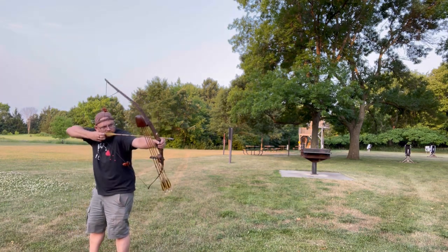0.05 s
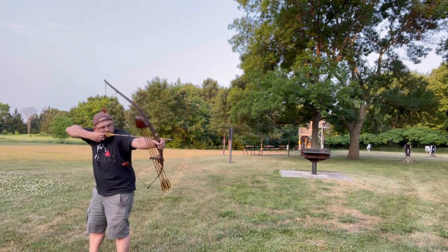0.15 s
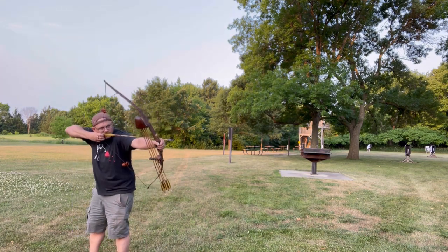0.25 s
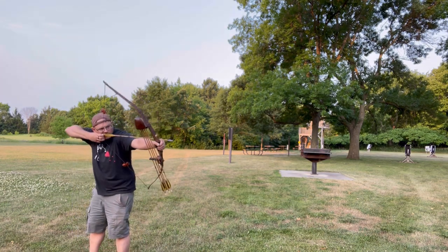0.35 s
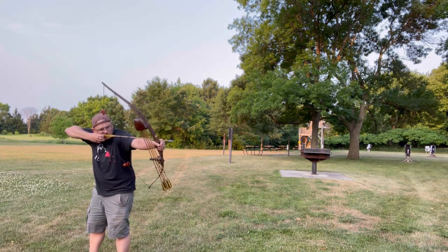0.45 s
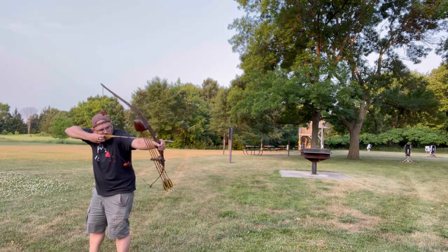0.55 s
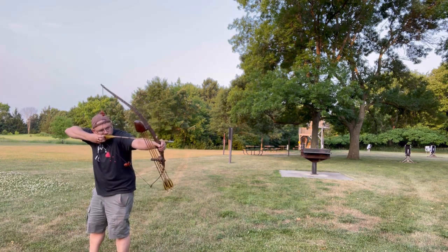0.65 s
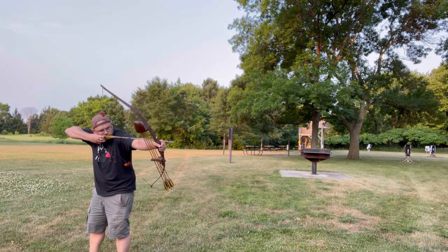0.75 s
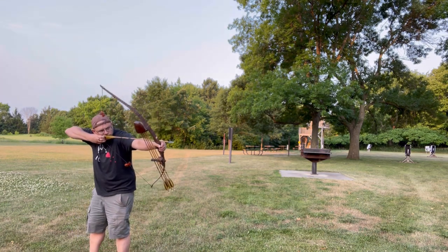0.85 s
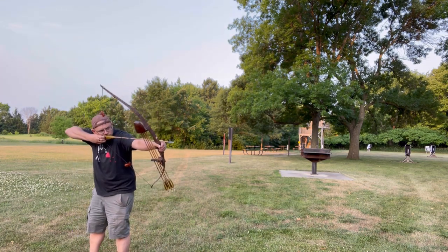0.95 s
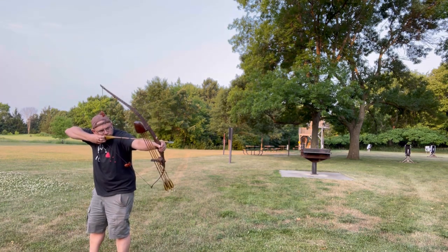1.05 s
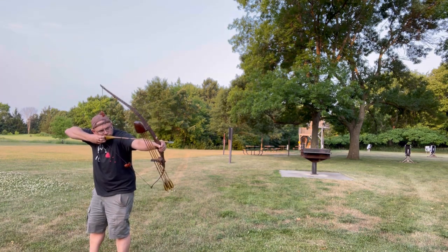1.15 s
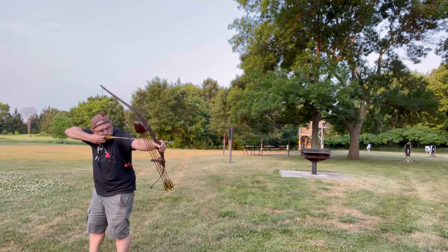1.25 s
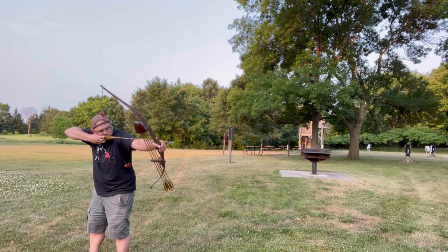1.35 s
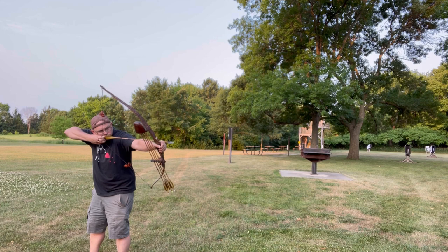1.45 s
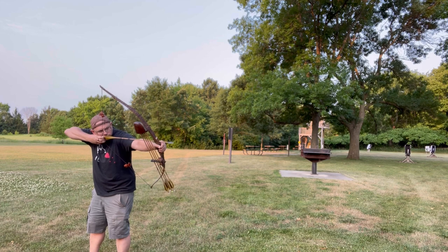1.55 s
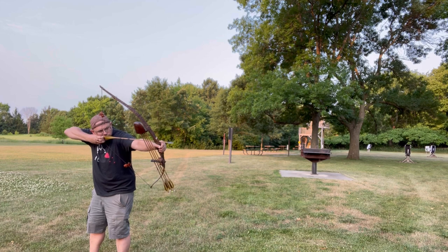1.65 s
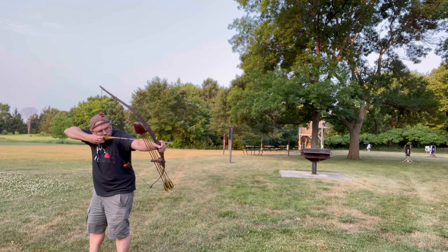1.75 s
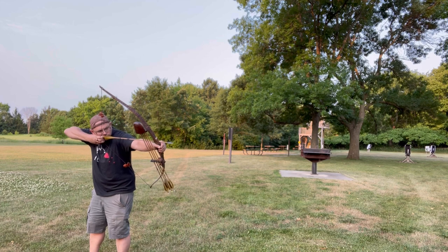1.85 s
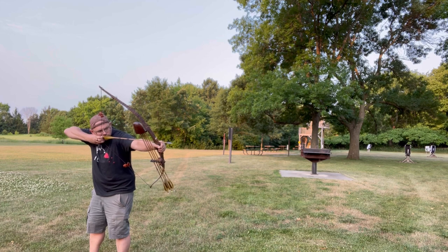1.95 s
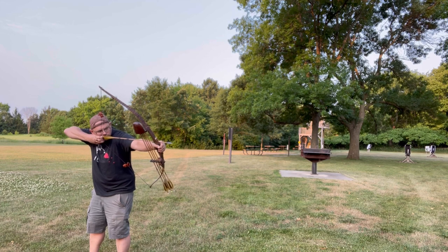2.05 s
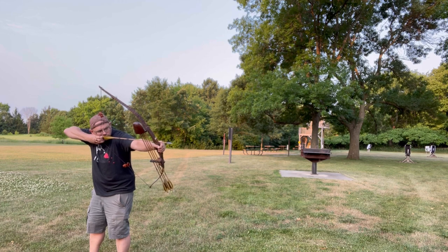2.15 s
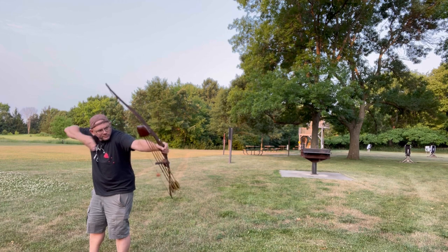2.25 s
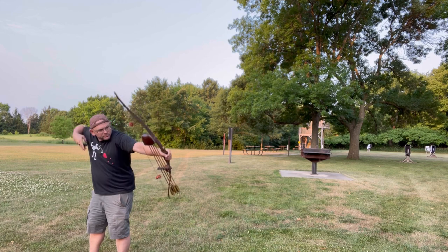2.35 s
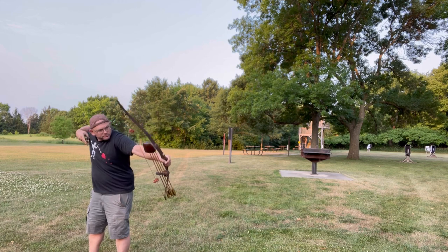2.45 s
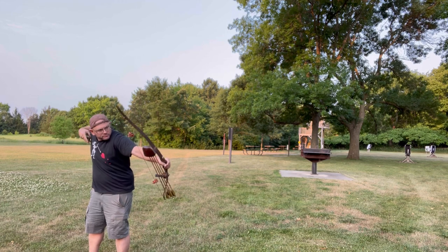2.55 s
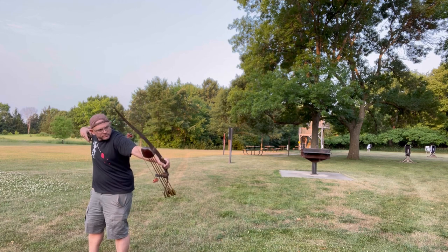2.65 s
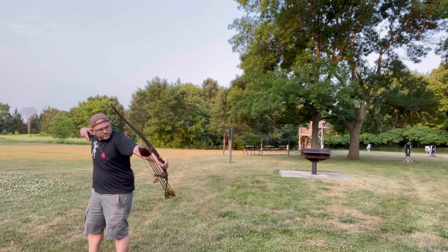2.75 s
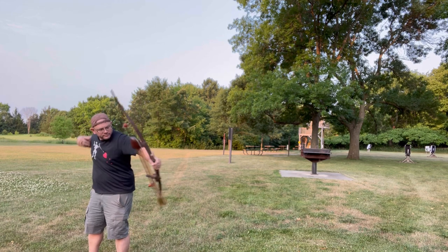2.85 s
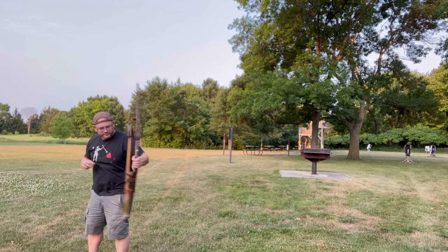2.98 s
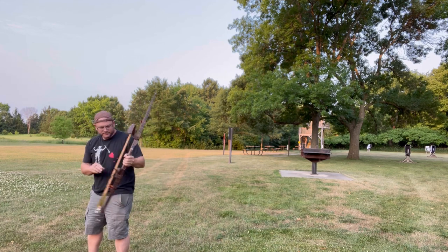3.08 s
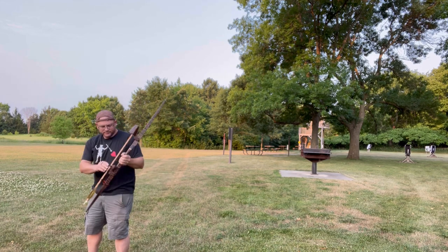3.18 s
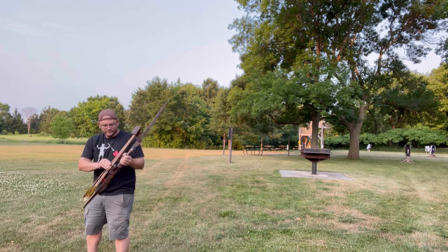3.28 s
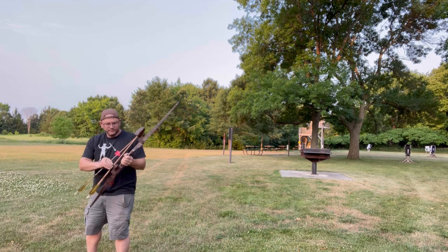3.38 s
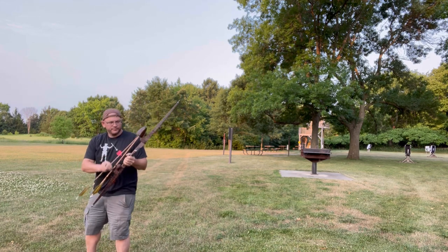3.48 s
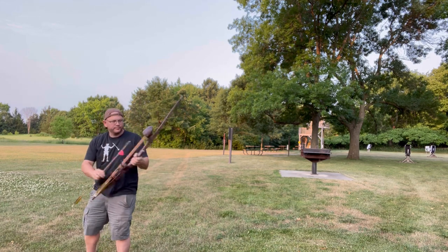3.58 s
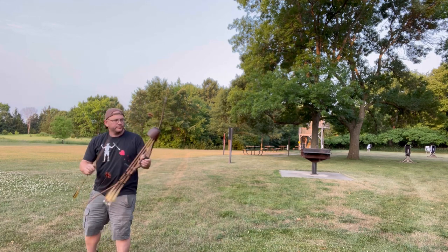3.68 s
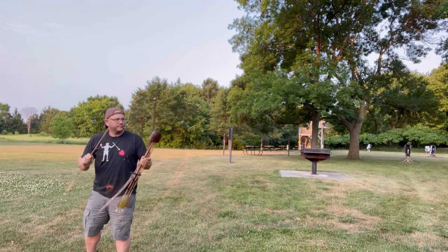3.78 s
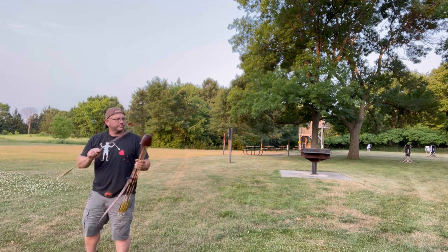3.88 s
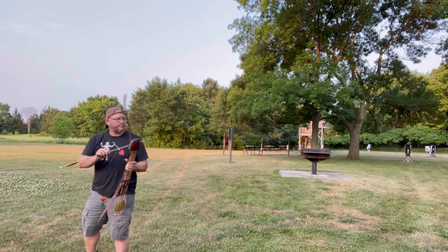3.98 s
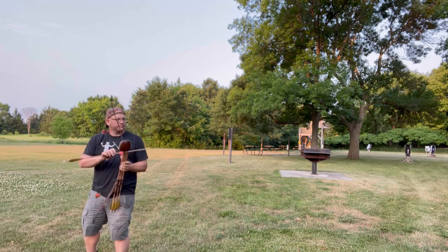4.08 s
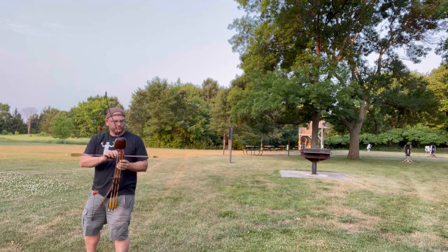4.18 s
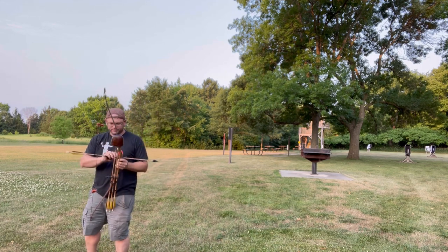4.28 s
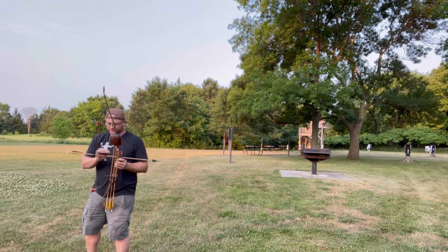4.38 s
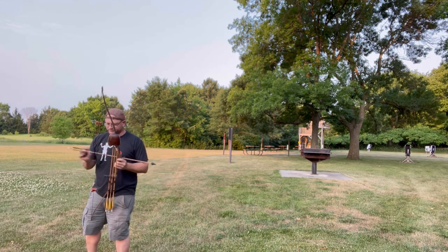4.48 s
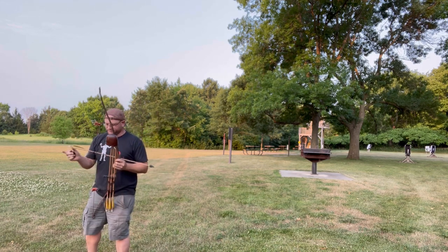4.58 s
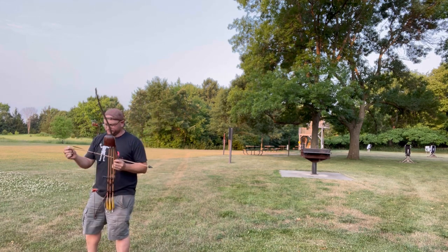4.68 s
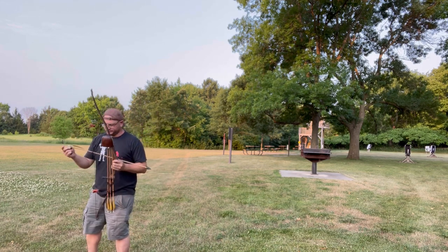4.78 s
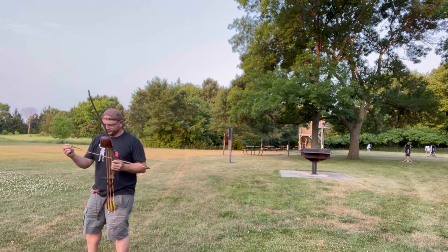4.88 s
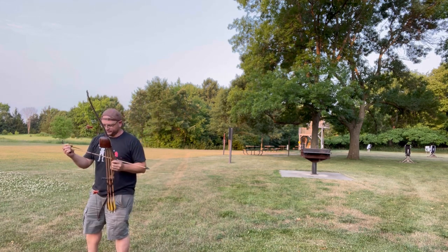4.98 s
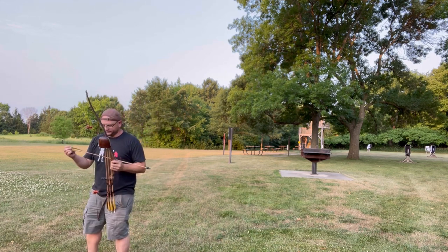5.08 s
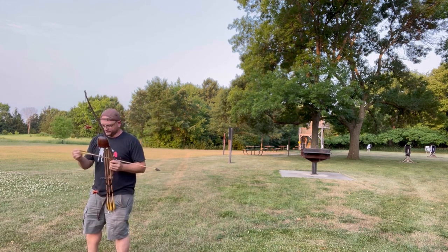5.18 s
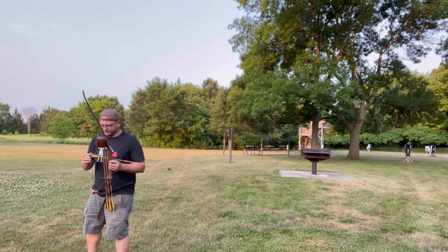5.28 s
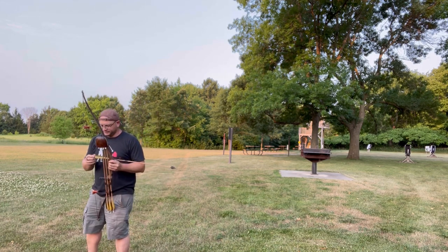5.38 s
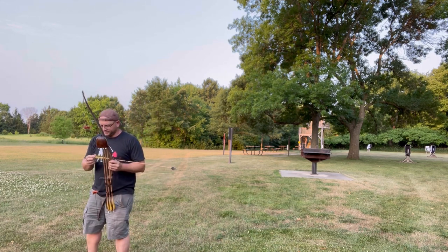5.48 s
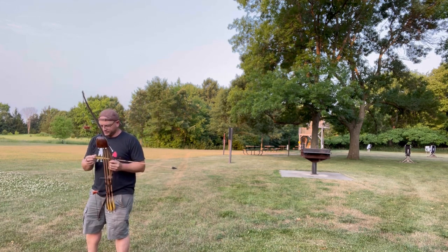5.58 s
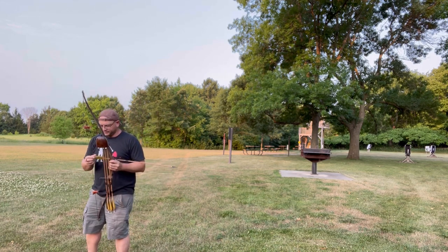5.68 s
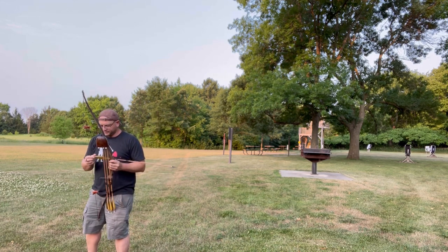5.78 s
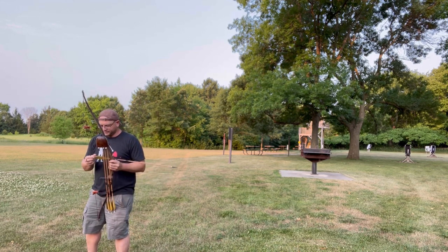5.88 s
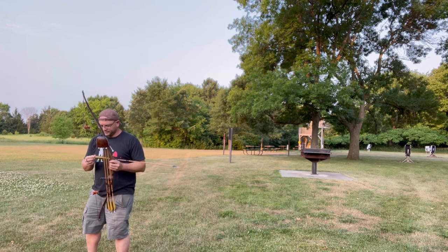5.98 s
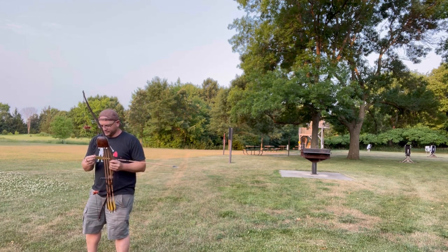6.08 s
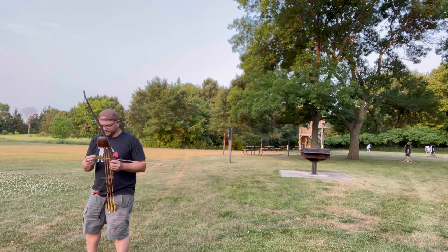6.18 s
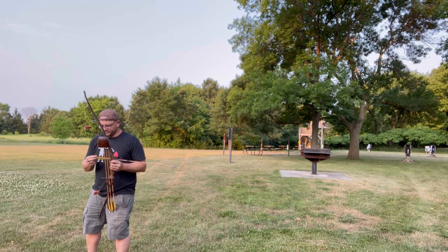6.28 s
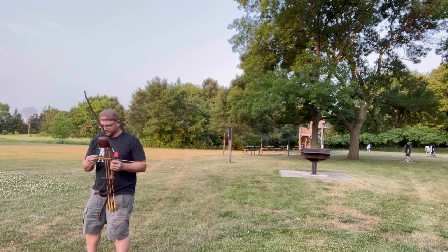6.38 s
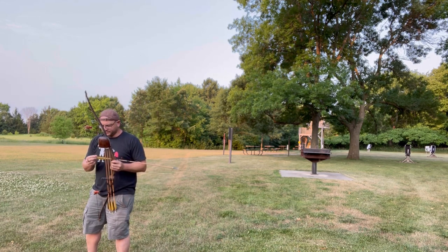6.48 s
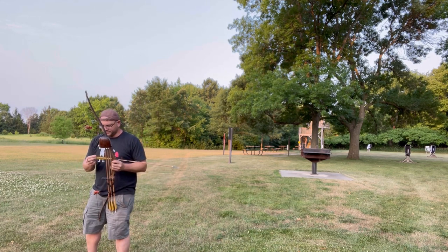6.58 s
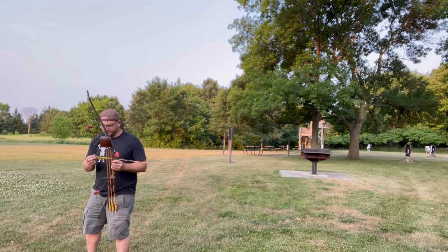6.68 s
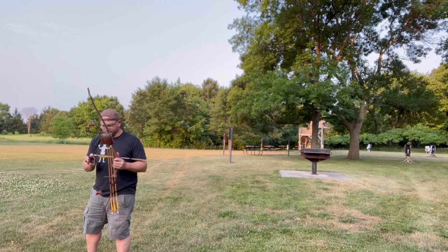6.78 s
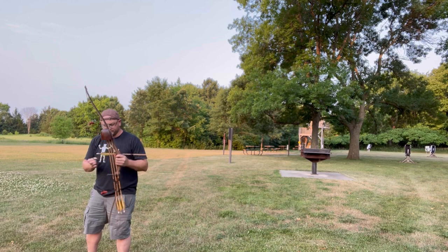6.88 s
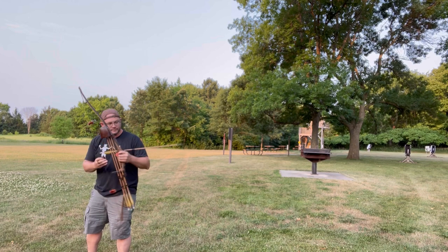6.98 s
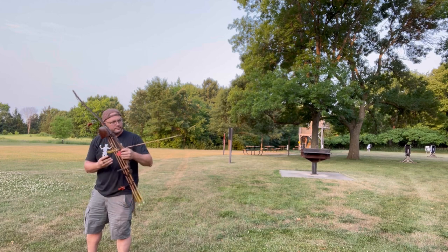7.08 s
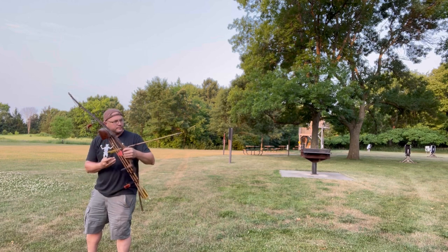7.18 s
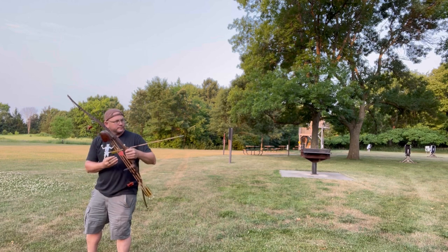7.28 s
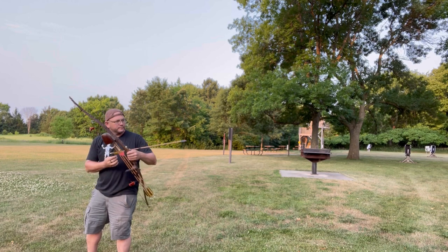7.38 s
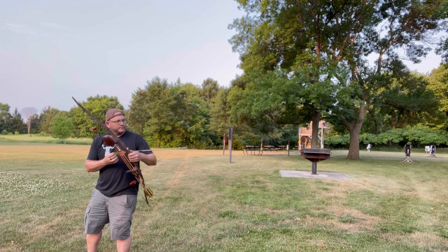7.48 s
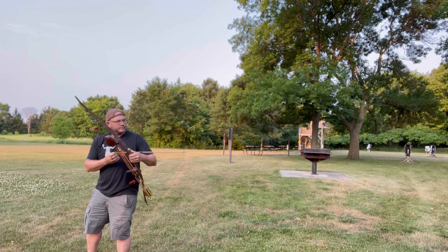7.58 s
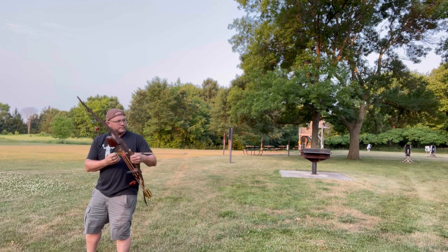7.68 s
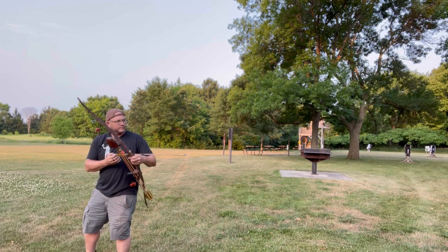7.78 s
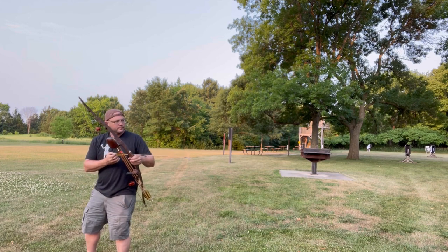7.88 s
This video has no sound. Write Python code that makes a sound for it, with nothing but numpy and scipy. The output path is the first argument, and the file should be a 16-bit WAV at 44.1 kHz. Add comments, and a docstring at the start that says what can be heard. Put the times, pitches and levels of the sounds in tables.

```python
"""Birds trill and carol from the trees over shimmering insects, a buffeting breeze, far traffic and an engine drone.
An archer looses an arrow: string and bow crack and ring, spare arrows chatter; a third of a second on, it thuds home.
A near songbird whistles paired figures while the next arrow scrapes and clicks on quiver and bow; the breeze drops.
Bow and target are noise bursts and damped modes, the birds are gliding sines with diffuse echoes,
the scrapes are noise broken into small catches, and the air is coloured noise."""
import sys
import numpy as np
from scipy import signal
from scipy.fft import rfft, irfft, next_fast_len
from scipy.io import wavfile
from scipy.ndimage import uniform_filter1d, map_coordinates

SR = 44100
rng = np.random.default_rng(int(sys.argv[2]) if len(sys.argv) > 2 else 0)


def generate_wav(signal):
    """Clip the signal to [-1, 1] and save it as 16-bit WAV at the path in sys.argv[1]."""
    frames = np.transpose(np.atleast_2d(signal))
    scaled = np.clip(frames, -1, 1) * 32767
    pcm = np.round(scaled).astype(np.int16)
    wavfile.write(sys.argv[1], SR, pcm)


N = 350154
TIME = np.arange(N) / SR


def gain_of(db):
    """Turns decibels into a linear gain."""
    return 10 ** (np.asarray(db) / 20)


def evened(x):
    """Scales to rms 1."""
    return x / np.sqrt(np.mean(x ** 2) + 1e-20)


def read(points, hz):
    """Reads a table on a log-frequency axis."""
    f, value = np.transpose(points)
    return np.interp(np.log(hz + 1), np.log(f + 1), value)


def level(curve):
    """Turns a dB curve over time into a gain for every sample."""
    return gain_of(np.interp(TIME, *np.transpose(curve)))


def add(mix, s, sound):
    """Mixes a sound in at a time, trimming what falls outside the scene."""
    start = round(s * SR)
    sound = sound[..., max(-start, 0):]
    part = mix[..., max(start, 0):][..., :sound.shape[-1]]
    part += sound[..., :part.shape[-1]]


def noise(colour, likeness, size=N):
    """Coloured noise at two microphones that hear partly the same."""
    full = next_fast_len(size)
    hz = np.fft.rfftfreq(full, 1 / SR)
    left, other = rfft(rng.standard_normal((2, full)))
    same = np.clip(read(likeness, hz) if np.ndim(likeness) else likeness, -1, 1)
    right = same * left + np.sqrt(1 - same ** 2) * other
    spectrum = np.array([left, right]) * gain_of(read(colour, hz))
    return evened(irfft(spectrum, full)[:, :size])


def place(x, lead_ms, left_db):
    """Direction: the left microphone hears a sound lead_ms earlier and left_db louder than the right."""
    side, full = np.array([[.5], [-.5]]), next_fast_len(N + 64)
    hz = np.fft.rfftfreq(full, 1 / SR)
    turn = np.exp(2j * np.pi * hz * side * lead_ms / 1000)
    return irfft(rfft(x, full) * turn, full)[:, :N] * gain_of(side * left_db)


def ports(x, phase, balance):
    """The two microphone ports differ in phase and level from band to band."""
    side, full = np.array([[.5], [-.5]]), next_fast_len(N + 4096)
    hz = np.fft.rfftfreq(full, 1 / SR)
    turn = np.exp(1j * side * read(phase, hz))
    return irfft(rfft(x, full) * turn * gain_of(side * read(balance, hz)), full)[:, :N]


def fade(t, t60):
    """Exponential decay that falls 60 dB in t60 seconds."""
    return np.exp(-np.log(1000) * t / t60)


def burst(colour, t60, same, size=8192):
    """A dense cluster of modes struck at once and dying together, made of decaying noise."""
    t = np.arange(size) / SR
    return noise(colour, same, size) * fade(t, t60) * (1 - np.exp(-t / .0004))


def ring(modes, rise_s, sharp=0, sag_s=1, size=22050):
    """Separate damped modes after a blow that builds over rise_s; they may start sharp by a share and sag."""
    t = np.arange(size) / SR
    warped = t + sharp * sag_s * (1 - np.exp(-t / sag_s))
    tones = np.zeros(size)
    for k, (hz, db, t60) in enumerate(modes):
        tones += (-1) ** k * gain_of(db) * fade(t, t60) * np.sin(2 * np.pi * hz * warped)
    return (1 - np.exp(-t / rise_s)) * tones


def scatter(x, t60, wet_db, colour=((20, 0), (20000, 0)), size=44100):
    """Adds the diffuse return from grass, trunks and leaves."""
    t, hz = np.arange(size) / SR, np.fft.rfftfreq(size, 1 / SR)
    tail = rng.standard_normal((2, size)) * fade(t, t60) * (1 - np.exp(-t / 0.0034))
    tail = rfft(tail / np.linalg.norm(tail[0])) * gain_of(read(colour, hz))
    tail = irfft(tail, size)[:, :-1024]
    return x + gain_of(wet_db) * signal.fftconvolve(x, tail, axes=1)[:, :N]


def wander(per_s):
    """A slow random curve of rms 1 that turns about per_s times a second."""
    knots = rng.standard_normal(400)
    return evened(np.interp(TIME * per_s, np.arange(len(knots)), knots))


def shimmer(depth_db, per_s=130):
    """A gliding note flickers in level as its paths through the leaves add and cancel."""
    knots = rng.standard_normal(4000)
    return evened(gain_of(depth_db * np.interp(TIME * per_s, np.arange(len(knots)), knots)))


def catches(size, grain_db=4, clump_db=1.6):
    """The uneven grip of dry friction: fine grains that come in clumps."""
    grains, clumps = rng.standard_normal((2, SR))
    grains = evened(uniform_filter1d(grains, size=130))
    clumps = evened(uniform_filter1d(clumps, size=700))
    return gain_of(grain_db * grains + clump_db * clumps)[:size]


def whistle(contour, buzz_hz=0, buzz_per_s=150, waver=0.0075):
    """A bird's pure tone along a rounded pitch contour, with an optional fast flutter that dwindles."""
    s, hz, db = np.transpose(contour)
    t = np.arange(0, max(s[-1], .008), 1 / SR)
    pitch = uniform_filter1d(np.interp(t, s, hz), size=180, mode="nearest")
    pitch *= 1 + waver * evened(uniform_filter1d(rng.standard_normal(len(t)), size=90))
    pitch += buzz_hz * np.sin(2 * np.pi * buzz_per_s * t) * (1 - t / t[-1])
    tone = np.sqrt(2) * np.sin(2 * np.pi * np.cumsum(pitch) / SR)
    return gain_of(np.interp(t, s, db)) * tone * signal.windows.tukey(len(t), .2)


def swoop(length, start_hz, end_hz, db, sag=.12):
    """One note, loudest in the middle: its pitch sags below a straight glide, or arches above for sag < 0."""
    middle_hz = (start_hz + end_hz) / 2 - sag * abs(end_hz - start_hz)
    contour = [(0, start_hz, db - 3.5), (length / 2, middle_hz, db + 4.0), (length, end_hz, db - 2.5)]
    return whistle(contour, waver=0.0085)


# bouts of song from birds deep in the trees, before the layer trims: start_s, length_s, level_db
BOUTS = [(-.05, 0.16, -62), (0.809, 0.24, -61), (1.578, 0.52, -65), (2.184, 0.36, -61),
         (3.274, 0.11, -58.5), (3.656, 0.42, -60.5), (4.383, 0.29, -62), (5.62, 0.27, -63),
         (6.81, 0.42, -62.5), (7.8, .14, -69.5)]
BOUT_RISE_S, BOUT_T60_S, LULL_DB = .09, 0.63, -73  # lull level also before the layer trims


def bird_activity():
    """Each bout of far song swells, holds and echoes away into the lull."""
    power = np.full(N, gain_of(LULL_DB) ** 2)
    for s, length, db in BOUTS:
        rise = np.clip((TIME - s) / BOUT_RISE_S, 0, 1)
        bout = gain_of(db) * rise * fade(np.maximum(TIME - s - length, 0), BOUT_T60_S)
        power += bout ** 2
    return np.sqrt(power)


# the breeze holds for six seconds, drops, then partly returns; before the wind trims: time_s, level_db
BREEZE = [(0, -44.5), (.75, -46.5), (1.3, -46.5), (2.8, -49), (3.1, -46.5), (4.4, -44.5), (6.05, -47.5),
          (6.33, -59), (7.94, -52.5)]
# gusts that thump the microphone, before the wind trims: peak_s, length_s, level_db
GUSTS = [(0.158, .08, -37), (0.267, 0.048, -37), (0.626, 0.16, -38.5), (1.933, 0.066, -39.5),
         (2.08, 0.054, -37), (2.423, .06, -42.5), (3.113, .04, -32.5), (3.267, 0.029, -34),
         (3.388, 0.04, -40.5), (3.623, 0.04, -37.5), (3.806, 0.06, -43), (4.44, 0.07, -40),
         (4.905, .04, -39), (5.256, 0.036, -38), (5.386, 0.046, -32.5), (5.775, 0.058, -34.5),
         (5.883, 0.069, -35), (6.02, 0.061, -32.5), (6.21, 0.036, -45)]


def wind_strength():
    """Bell-shaped gusts ride on the breeze."""
    power = level(BREEZE) ** 2
    for s, length, db in GUSTS:
        power += (gain_of(db) * np.exp(-2 * ((TIME - s) / length) ** 2)) ** 2
    return np.sqrt(power)


# spectra of wind, far traffic and bird haze: freq_hz, relative level_db per Hz
WIND_COLOUR = [(18, -35.5), (35, -11), (60, 0), (110, -7), (170, -18.5), (300, -31.5), (700, -52),
               (2000, -86.5), (6000, -100)]
FAR_COLOUR = [(50, -24.5), (90, -10), (130, -10.5), (200, -14), (300, -11), (380, -12.5), (600, -14.5),
              (780, -16.5), (1080, -23.5), (1550, -26), (2150, -34), (2900, -40), (4000, -46), (9000, -55),
              (16000, -71)]
CHORUS_COLOUR = [(1700, -28), (2200, -17), (2550, -2.5), (3200, 3), (4800, -1.5), (5600, -27), (8000, -41)]
# distant traffic swelling and easing, before its trim: time_s, level_db
TRAFFIC = [(0.0, -62), (0.35, -61), (2.28, -60), (3.25, -62), (4.38, -59), (7.32, -61), (7.94, -59.5)]
# how alike the traffic is at the two microphone ports: freq_hz, likeness (0 to 1)
FAR_SAME = [(100, 0.56), (350, 0.7), (500, 0.02), (700, 0.48), (1000, 0.14), (1500, 1), (2200, 0.4),
            (4000, 0), (9000, 1), (16000, .5)]
# how far the left port leads on far sound: freq_hz, lead_radians
FAR_PHASE = [(110, 0), (200, -0.44), (440, -2), (540, -4), (1400, -5), (2100, -4.5), (3400, -7),
             (5500, -9.5), (8000, -6.5), (11500, -3.5), (14500, 0)]
# left minus right on far sound, for traffic and insects: freq_hz, difference_db
FAR_BALANCE = [(100, -2), (250, -2), (450, -3.5), (800, -0.1), (1250, 1), (1900, -3.5), (3000, 0),
               (6500, -3), (10000, 0)]


def air(wind_db=-0.5, far_db=5, chorus_db=-6.5, lump_db=1.8, gust_db=-50.5):
    """Lumpy wind at each microphone, far traffic and a haze of distant birds, all from coloured noise."""
    strength = wind_strength()
    lumps = evened(gain_of(lump_db * wander(25)))
    wind = noise(WIND_COLOUR, 0.2) * strength * lumps * gain_of(wind_db)
    # strong gusts shed smaller eddies, which reach higher
    eddy_colour = [(70, -23.0), (120, 5.5), (170, 11.5), (260, -16), (600, -44.0), (2500, -80)]
    eddies = noise(eddy_colour, 0.099) * (strength / strength.max()) ** 1.8 * gain_of(gust_db)
    traffic = noise(FAR_COLOUR, FAR_SAME) * level(TRAFFIC) * gain_of(far_db)
    chorus = noise(CHORUS_COLOUR, 0.033) * bird_activity() * gain_of(chorus_db)
    return wind + eddies + ports(traffic, FAR_PHASE, FAR_BALANCE) + chorus


# tones of a far engine, before the swell: pitch_hz, level_db (rms)
DRONE = [(117, -61), (179, -62), (240, -69), (358, -68), (388, -68)]
# how the drone swells and recedes: time_s, change_db
DRONE_SWELL = [(0, -8), (2.5, -1), (3.7, 1), (5.5, 1.5), (6.6, -1.5), (7.1, -4.5), (7.94, 3.5)]


def drone(drift=0.014, flutter_db=3.8):
    """Engine orders waver and fade on their way through moving air."""
    out = np.zeros(N)
    for hz, db in DRONE:
        tone = np.sin(2 * np.pi * np.cumsum(hz * (1 + drift * wander(8))) / SR)
        out += gain_of(db) * evened(tone * gain_of(flutter_db * wander(7)))
    return place(out * level(DRONE_SWELL), lead_ms=-0.5, left_db=-2.0)


# the steady shimmer of far insects: freq_hz, relative level_db per Hz
INSECT_COLOUR = [(2000, -27.5), (2300, -9), (2580, 0), (2930, -2), (3300, -6), (3800, -12.5), (4500, -25),
                 (7000, -49.5)]
# how far the left port leads on the insects: freq_hz, lead_radians
INSECT_PHASE = [(2200, -4), (2600, -3), (3300, -2), (3800, -1.5), (4500, -.3)]
INSECT_DB, INSECT_SAME = -68, 0.95  # level before the port balance, left-right likeness


def insects():
    """A narrow steady band of noise from the meadow that reaches the two ports out of step."""
    return ports(noise(INSECT_COLOUR, INSECT_SAME), INSECT_PHASE, FAR_BALANCE) * gain_of(INSECT_DB)


def flock(count=260, flock_db=-4.0):
    """Birds deep in the trees: many short swoops, mostly heard as echo, that die away in the lulls."""
    out, activity = np.zeros(N), bird_activity()
    for when, length, pitch, slope in rng.random((count, 4)):
        hz, seconds = 2600 + 1100 * pitch, .025 + .04 * length
        add(out, when * N / SR, swoop(seconds, hz, hz * (.84 + .33 * slope), 0))
    echoing = evened(scatter(np.array([out, out]), t60=0.2, wet_db=12))
    return echoing * activity * np.sqrt(activity / activity.max()) * gain_of(flock_db)


# high whistles and slurs, before the direct trim: start_s, length_s, start_hz, end_hz, level_db
WHISTLES = [(1.968, .035, 3300, 4700, -66), (2.0, .04, 4600, 5100, -67), (2.04, 0.045, 5200, 5100, -63),
            (5.699, .072, 4000, 4190, -60), (5.765, .045, 4400, 5140, -62), (5.8, .06, 5150, 4500, -64),
            (6.84, .05, 5000, 3700, -68), (6.893, 0.068, 4874, 5110, -63.5),
            (6.98, .045, 5060, 4950, -67.5), (7.218, 0.04, 4380, 4430, -63), (7.25, .02, 4400, 3900, -66),
            (7.272, .045, 4420, 4400, -65.5), (7.796, 0.034, 6200, 6200, -77.5),
            (7.825, 0.042, 5600, 4250, -77), (7.87, .04, 6100, 4700, -79)]


def whistler(direct_db=-2.0):
    """High arching whistles from deep in the trees, heard as much by their echo as directly."""
    out = np.zeros(N)
    for s, *shape in WHISTLES:
        add(out, s, swoop(*shape, sag=-.1))
    placed = place(out * shimmer(3.5), lead_ms=-.1, left_db=1)
    return gain_of(direct_db) * scatter(placed, t60=0.55, wet_db=-1.5)


def syllable(length, db, *pitches, edge_db=-4):
    """A note that bends smoothly through its pitches and is loudest in the middle."""
    u = np.linspace(0, 1, 40)
    hz = map_coordinates(np.array(pitches, float), [u * (len(pitches) - 1)], order=2, mode="nearest")
    return whistle(np.c_[u * length, hz, db + edge_db * ((2 * u - 1) ** 2 - .5)], waver=.008)


# a farther bird's syllables:
# start_s, length_s, level_db, start_hz, first_quarter_hz, middle_hz, third_quarter_hz, end_hz
CAROL = [(0, 0.04, -62.5, 3410, 3010, 2850, 2560, 3300), (.082, 0.034, -63.5, 3550, 3250, 3100, 2800, 2400),
         (.12, .085, -63.5, 2610, 2820, 2800, 2780, 2760), (.745, .06, -66, 2650, 2800, 2900, 2740, 2600),
         (.81, 0.032, -65, 2800, 2950, 3050, 3300, 3600), (.815, .04, -59, 4700, 4350, 4000, 3750, 3500),
         (.872, .066, -67, 3100, 2900, 2250, 2400, 2200),
         (.932, 0.061, -58.5, 3450, 2670, 2530, 2430, 2250),
         (.958, 0.033, -57.5, 4680, 4300, 3750, 3300, 2850), (1.0, 0.03, -58, 2360, 2650, 2950, 3200, 3300),
         (1.03, .038, -56.5, 3250, 2950, 2730, 2670, 2680),
         (1.015, .035, -65, 4300, 4650, 4750, 4600, 4300), (1.065, .032, -63, 3940, 4080, 3900, 3700, 3550),
         (1.54, .036, -66.5, 3020, 3110, 3130, 2950, 2650),
         (1.592, .024, -63, 2650, 2850, 3100, 3350, 3600),
         (1.634, 0.078, -67, 3390, 2850, 2500, 2380, 2280),
         (1.798, 0.05, -65.5, 3000, 3100, 2950, 2550, 2250),
         (1.857, .05, -62.5, 2540, 3200, 3500, 3310, 2750), (1.91, .025, -67, 2600, 2500, 2450, 2470, 2430),
         (1.978, .018, -65, 2600, 2400, 2200, 2120, 2050), (2.102, .04, -65, 2750, 2950, 2900, 2650, 2500),
         (2.228, .09, -58, 2930, 2880, 2920, 2900, 2560), (2.318, .056, -60, 5300, 5100, 4750, 4050, 3300),
         (2.388, 0.11, -57.5, 3650, 3370, 3280, 2840, 2580),
         (2.458, .028, -62, 4100, 3950, 3650, 3350, 3100), (3.295, .055, -66, 2600, 2500, 2350, 2300, 2300),
         (3.76, 0.025, -56, 3050, 3150, 3300, 3450, 3550), (3.781, .025, -53, 3560, 3690, 3760, 3780, 3750),
         (3.852, 0.046, -64, 2600, 2900, 3450, 3870, 4150),
         (4.015, .05, -59.5, 3000, 3160, 3380, 3620, 3620),
         (4.05, 0.029, -58.5, 3020, 2950, 2830, 2580, 2300),
         (4.082, .038, -56.5, 2450, 3050, 3230, 2900, 2520),
         (4.118, 0.049, -55, 2570, 2640, 2710, 2760, 2790), (4.215, .03, -57, 2900, 2830, 2750, 2560, 2300),
         (4.246, .034, -57, 2500, 3080, 3150, 2860, 2560),
         (4.278, .046, -58.5, 2580, 2620, 2680, 2700, 2660),
         (4.446, .05, -65.5, 2850, 2930, 2850, 2650, 2400),
         (4.575, 0.06, -65, 2600, 2950, 3200, 3500, 3600), (4.655, .035, -68, 3350, 3250, 3100, 2890, 2650),
         (4.78, .054, -67.5, 3340, 3390, 3450, 3500, 3500),
         (5.076, .058, -63, 3330, 3370, 3400, 3450, 3460), (5.128, .016, -62, 4400, 4100, 3800, 3550, 3400),
         (5.192, .022, -66, 3000, 2700, 2450, 2300, 2150),
         (5.305, .035, -67.5, 3500, 3260, 2950, 2750, 2600),
         (5.533, .025, -66, 3150, 2850, 3000, 3200, 3350),
         (5.563, 0.055, -62, 3310, 2380, 2220, 2170, 2320), (5.619, .04, -58, 2330, 2550, 2850, 3250, 3500),
         (5.671, 0.054, -57, 3200, 2760, 2720, 2540, 2520),
         (5.788, 0.045, -61.5, 3000, 3030, 2900, 2570, 2560),
         (5.835, .04, -60.5, 3300, 3140, 3020, 3010, 2980),
         (5.86, 0.048, -65, 2790, 2550, 2350, 2220, 2130), (6.9, .054, -63.5, 2980, 2790, 2690, 2560, 2150),
         (6.954, .056, -62.5, 2250, 2806, 2850, 2480, 2150),
         (7.016, 0.044, -57.5, 3280, 3110, 2900, 2505, 2050),
         (7.06, .024, -56.5, 2100, 2660, 3150, 3460, 3650),
         (7.094, 0.055, -55.5, 3300, 2700, 2480, 2220, 2080),
         (7.15, 0.071, -54, 2090, 2670, 2850, 2940, 3450), (7.267, .04, -63, 3400, 3050, 2850, 2670, 2520)]


def carol(count=6, trunk_db=-21.5):
    """Quick turning syllables, doubled by echoes from trunks and blurred by the leaves between."""
    out = np.zeros(N)
    for s, *shape in CAROL:
        note = syllable(*shape)
        add(out, s, note)
        for delay in rng.uniform(0.0028, .06, count):
            add(out, s + delay, gain_of(trunk_db) * note)
    return scatter(place(out * shimmer(1.8), lead_ms=-.36, left_db=2.5), t60=0.52, wet_db=-6.0)


# one chip of the trill: time_s from its start, pitch_hz, relative level_db
CHIP = [(0, 8200, -10), (.003, 8050, -9), (.0048, 7400, -3), (.008, 6750, 2), (.012, 5900, -1),
        (.0155, 5250, 1.5), (.018, 4500, -3), (.0207, 3500, -22)]
# the second voice that ends the chip: time_s from its own start, pitch_hz, relative level_db
CHIP_END = [(0, 5750, -6), (.003, 4950, 0), (.0058, 4000, -14)]
# tone of the trill's echo: freq_hz, gain_db
TRILL_ECHO = [(3500, -8), (5000, -2.5), (6600, 2.5), (8100, 4), (8700, -20)]


def trill(count=43, chip_db=-50, second_voice_db=-55):
    """A dry trill of falling chips that slows a little; the second side of the syrinx ends each chip."""
    out = np.zeros(N)
    for k in range(count):
        s = -.0053 + .04206 * k + .0000333 * k * k  # the gaps widen slightly
        effort_db = rng.normal(0, 1.0)
        add(out, s, gain_of(chip_db + effort_db) * whistle(CHIP, waver=0.008))
        add(out, s + 0.0173, gain_of(second_voice_db + effort_db) * whistle(CHIP_END))
    placed = place(out * shimmer(1.8, per_s=300), lead_ms=-0.058, left_db=-0.7)
    return scatter(placed, t60=0.55, wet_db=-10.3, colour=TRILL_ECHO)


SONG_DB_PER_KHZ = -3.5  # within a note, the top is the softest part


def figure(slide_in, hold, slide_out, start_hz, turn_hz, end_hz, db, bend_in=1.15, bend_out=1.55, edge_db=-6.5):
    """A note whose two slides each start fast and ease off; it is softer at its ends and at its top."""
    length = slide_in + hold + slide_out
    t = np.linspace(0, length, 40)
    to_turn = np.clip(1 - t / slide_in, 0, 1) ** bend_in
    to_end = np.clip((length - t) / slide_out, 0, 1) ** bend_out
    hz = end_hz + (turn_hz - end_hz) * to_end + (start_hz - turn_hz) * to_turn
    khz = hz / 1000
    note_db = db + SONG_DB_PER_KHZ * (khz - khz.mean()) + edge_db * (2 * t / length - 1) ** 2
    return np.c_[t, hz, note_db]


WARBLE_S, WARBLE_LEAD_S, WARBLE_PER_S = 0.124, .0138, 35.2  # length, lead-in, swings per second
WARBLE_LOW_HZ, WARBLE_SWING_HZ = 3910, 1800
WARBLE_LEAD_HZ = 400  # the lead-in rises from this far below


def warble(db, roundness=1.2, top_db=-1):
    """A low lead-in, then quick round-topped swings of pitch."""
    t = np.linspace(0, WARBLE_S, 120)
    swing = abs(np.sin(np.pi * WARBLE_PER_S * np.maximum(t - WARBLE_LEAD_S, 0))) ** roundness
    lead_in = WARBLE_LEAD_HZ * np.maximum(1 - t / WARBLE_LEAD_S, 0)
    return np.c_[t, WARBLE_LOW_HZ + WARBLE_SWING_HZ * swing - lead_in, db + top_db * (swing - .5)]


# figures sung twice, sliding to a turning pitch and away again: start_s, repeat_after_s, slide_in_s, hold_s,
# slide_out_s, start_hz, turn_hz, end_hz, level_db, repeat_level_db, buzz_depth_hz
SONG = [(2.56, .31, .046, 0, .033, 7500, 6450, 5800, -61, -61.5, 450),
        (3.192, .2, .022, .012, .058, 4350, 4540, 3800, -52, -52, 0),
        (3.288, .207, .028, 0, 0.015, 4900, 7600, 5480, -65, -65, 0),
        (3.624, 0.258, .009, .011, .011, 7600, 6480, 7650, -62, -59.5, 0),
        (3.654, 0.26, .043, .005, 0.039, 4200, 5140, 3100, -52.5, -53, 0),
        (4.16, .25, .018, .004, .012, 6500, 7420, 7540, -64.5, -66, 0),
        (4.215, .2375, 0.049, 0.016, .048, 3200, 6340, 3180, -53.5, -54.5, 0),
        (4.686, .305, .013, 0, .002, 4300, 9000, 9000, -71, -72, 0),
        (4.703, .305, .026, 0, .049, 7400, 5900, 4980, -61, -66, 0),
        (4.832, .31, .016, .007, .03, 3450, 4680, 3050, -56, -60, 0)]
# the long falling note that opens the song: time_s from its start, pitch_hz, relative level_db
GLIDE = [(0, 5580, -7), (.036, 5150, -3), (.058, 4620, 3), (.08, 4350, 8), (.112, 4120, 6),
         (.122, 4050, -6)]
GLIDE_S, GLIDE_DB = 2.32, -58.5
# warbles: start_s, level_db
WARBLES = [(2.648, -57.5), (2.956, -57.5)]


def songbird(count=6, trunk_db=-22):
    """A falling note, warbles and paired figures from a near tree, with echoes from the trunks around it."""
    out = np.zeros(N)
    for s, again_s, *shape, first_db, second_db, buzz_hz in SONG:
        add(out, s, whistle(figure(*shape, first_db), buzz_hz))
        add(out, s + again_s, whistle(figure(*shape, second_db), buzz_hz))
    add(out, GLIDE_S, gain_of(GLIDE_DB) * whistle(GLIDE))
    for s, db in WARBLES:
        add(out, s, whistle(warble(db)))
    heard = out.copy()
    for delay in rng.uniform(.002, .02, count):
        add(heard, delay, gain_of(trunk_db) * out)
    return scatter(place(heard * shimmer(2), lead_ms=-0.028, left_db=-0.3), t60=0.59, wet_db=-9.0)


# the shaft slides over bow and quiver: start_s, length_s, level_db, treble_tilt_db per octave about 9 kHz
SCRAPES = [(3.168, 0.073, -75.5, -6), (3.291, 0.15, -70, 5), (3.298, .07, -58, -16), (3.313, .022, -55, -1),
           (3.343, .02, -60, -2), (3.395, 0.11, -61.5, 0), (3.41, .08, -62, -13), (3.568, 0.11, -65.5, -2),
           (3.664, 0.14, -75, -9), (4.01, 0.13, -66.5, -8), (4.492, 0.05, -75, 0), (5.0, .22, -80, 1),
           (5.148, 0.16, -65.5, 9), (5.18, .11, -68, -11)]
# colour of a sliding shaft before the tilt: freq_hz, relative level_db per Hz
SHAFT = [(900, -20), (2500, -8.5), (6000, 6), (8800, 9.5), (11000, -5), (15000, 3), (17000, -13)]
# the arrow knocks on quiver and bow: start_s, woody_body_db, bright_tick_db
KNOCKS = [(3.3033, -46, -60), (3.3182, -44.5, -51), (3.35, -54, -60), (3.3675, -55, -62),
          (3.4853, -42, -37), (3.4872, -35.5, -41), (3.6222, -62, -53), (4.207, -43.5, -50),
          (4.2108, -47.5, -58), (4.4975, -57, -50.5), (5.2628, -56, -60), (5.3457, -72, -57),
          (5.444, -54, -46), (5.4919, -69.5, -52.5), (5.9908, -68.5, -63), (6.2345, -81, -65),
          (6.4991, -52.5, -57)]
# the knocked wood rings briefly: freq_hz, relative level_db, t60_s
KNOCK_MODES = [(970, -7, .03), (1800, -5, .025), (2380, -5, .035)]
# colours of the knock's woody body and bright tick: freq_hz, relative level_db per Hz
KNOCK_BODY = [(250, -16), (500, -8), (1000, 0), (1700, 3), (2600, 4.5), (4200, 3), (6000, -24), (9000, -40)]
TICK = [(1500, -26), (4000, 4), (6500, -4), (9000, 4), (11000, -11), (15000, -2), (17000, -9)]


def next_arrow(ring_db=-6):
    """The shaft scrapes in small catches and knocks against wood."""
    out = np.zeros((2, N))
    for s, length, db, tilt_db in SCRAPES:
        size = int(max(length, .02) * SR)
        colour = [(hz, shaft_db + tilt_db * np.log2(hz / 9000)) for hz, shaft_db in SHAFT]
        rub = evened(noise(colour, 0.21, size=16384)[:, :size] * catches(size))
        add(out, s, gain_of(db) * rub * signal.windows.tukey(size, .8))
    for s, body_db, tick_db in KNOCKS:
        wood = gain_of(ring_db) * ring(KNOCK_MODES, rise_s=.0005, size=8192)
        add(out, s, gain_of(body_db) * (burst(KNOCK_BODY, t60=.022, same=0.2) + wood))
        add(out, s, gain_of(tick_db) * burst(TICK, t60=0.019, same=0.16))
    return scatter(out, t60=0.27, wet_db=-14.0)


# the point pierces the target face, then the shaft slaps: start_s, level_db
PIERCE = [(2.4912, -29.8), (2.499, -48), (2.515, -45.5)]
# colour of those smacks: freq_hz, relative level_db per Hz
PIERCE_COLOUR = [(290, -31), (500, -6.5), (1050, -7), (1230, -8), (2070, -10), (2810, -7), (3390, -16),
                 (5090, -14), (5800, -22), (8960, -22), (12100, -33), (14200, -30), (16000, -41)]
# the filling crunches as it stops the shaft: freq_hz, relative level_db per Hz
FILLING = [(80, -12), (170, -1), (400, -3), (650, 1), (1000, -3), (1300, -14), (2400, -14), (4000, -30)]
FILLING_S, FILLING_DB = 2.495, -35.5
# the butt's dull thud: freq_hz, relative level_db, t60_s
TARGET_MODES = [(115, -2.5, 0.11), (192, -0.5, 0.06), (290, 6, 0.024), (490, -10, 0.05), (660, -8.5, 0.052),
                (975, -4.5, 0.03)]
TARGET_S, TARGET_DB = 2.5045, -28.5


def target():
    """A sharp smack on the face, a crunch of filling, then the dull ringing thud of the butt."""
    hit = np.zeros((2, N))
    for s, db in PIERCE:
        add(hit, s, gain_of(db) * burst(PIERCE_COLOUR, t60=0.037, same=0.92))
    add(hit, FILLING_S, gain_of(FILLING_DB) * burst(FILLING, t60=.09, same=.9))
    add(hit, TARGET_S, gain_of(TARGET_DB) * ring(TARGET_MODES, rise_s=0.0011))
    return scatter(place(hit, lead_ms=-0.413, left_db=-1.5), t60=0.35, wet_db=-10.5)


# colour of the bright quiver ticks and the shiver under them: freq_hz, relative level_db per Hz
QUIVER_TICK = [(1500, -14), (4000, 2.5), (5500, 2), (7000, 1.5), (9000, 3), (11000, -6), (15000, -2),
               (17000, -12)]
RATTLE_S, RATTLE_DB, RATTLE_T60_S = 2.2, -50, .45  # start, level before the decay, decay time


def rattle(size=16384):
    """Shafts and feathers go on shivering against each other between the louder ticks."""
    shiver = evened(noise(QUIVER_TICK, .5, size) * catches(size, grain_db=3.5, clump_db=1.2))
    return gain_of(RATTLE_DB) * shiver * fade(np.arange(size) / SR, RATTLE_T60_S)


# colour of the crack: freq_hz, relative level_db per Hz
CRACK_COLOUR = [(240, -29), (400, -13), (536, -0.5), (753, -7.5), (960, -11), (1500, -10.5), (2100, -20),
                (2510, -14.5), (3640, -8), (5190, -17), (6150, -36), (7280, -22), (10700, -24),
                (12300, -42.5), (14400, -30.5), (16000, -34)]
# how each band of the crack dies and builds: freq_hz, t60_s, rise_s
CRACK_DECAY = [(400, .13, .004), (1200, .115, .0012), (3500, .105, .00012), (7000, .12, .00012),
               (15000, .072, .00012)]


def crack(size=16384, spike=2.2, spike_s=.0013):
    """A broad snap: a hard first spike, then dense modes; the lows build slower and the top dies first."""
    t, hz = np.arange(size) / SR, np.fft.rfftfreq(size, 1 / SR)
    z = rfft(noise(CRACK_COLOUR, [(400, .75), (1500, .88), (4000, .75), (15000, .75)], size))
    knots, t60s, rises = np.transpose(CRACK_DECAY)
    snap = np.zeros((2, size))
    # each band fades into its neighbours
    for share, t60, rise in zip(np.eye(len(knots)), t60s, rises):
        band = irfft(z * read(np.c_[knots, share], hz))
        snap += band * fade(t, t60) * (1 - np.exp(-t / rise))
    return snap * (1 + spike * np.exp(-t / spike_s))


# cracks as the string slaps home and the arrow clears the bow: start_s, level_db
CRACKS = [(2.1667, -25.5), (2.1815, -28.5)]
# what bow and string ring with: freq_hz, relative level_db, t60_s
BOW_MODES = [(467, -7, .13), (491, -4, .17), (512, -6, .12), (574, -9, .22), (628, -7, .13), (842, -8, .12),
             (928, -4, .1), (984, -9, .1), (1103, -11, .09), (1187, -5, .1), (1477, -7, .06),
             (2953, -12, .11), (3014, -13, .11), (3150, -11, .1), (3373, -13, .1), (3556, -13, .1),
             (3628, -11, .1), (8400, -17, .04)]
BOW_DB = -26.5
# the limbs shudder when the string stops them: freq_hz, relative level_db, t60_s
LIMB_MODES = [(68, -2.5, 0.22), (146, -6, 0.12), (188, -10, 0.15), (249, -2.5, 0.18), (306, -7, 0.11),
              (376, -11, 0.15)]
LIMB_S, LIMB_DB = 2.183, -23.5
# the string twangs, sharp while it swings wide, and sags as it settles: settled_hz, relative level_db, t60_s
TWANG = [(335, -12, .2), (552, 0, .18), (835, -9, .16)]
TWANG_S, TWANG_DB, TWANG_SHARP, TWANG_SAG_S = 2.184, -24.5, .16, .055  # sharpness is a share of the pitch
# the shock thumps through the grip into the bow arm: freq_hz, relative level_db per Hz
THUMP = [(60, -12), (140, 0), (350, -3), (600, -3), (1000, -15), (2000, -24), (4000, -28), (6000, -40)]
THUMP_S, THUMP_DB = 2.198, -38.5
# spare arrows chatter in the quiver: start_s, woody_body_db, bright_tick_db
CHATTER = [(2.166, -45, -26), (2.174, -28, -48), (2.1813, -38, -20.5), (2.193, -30, -42), (2.197, -33, -35),
           (2.21, -37, -48), (2.2193, -49, -33.5), (2.2345, -41, -40), (2.2435, -52, -47),
           (2.258, -44, -42.5), (2.268, -58, -45.5), (2.276, -56, -51), (2.2905, -60, -50),
           (2.302, -63, -46.5), (2.309, -65, -51), (2.315, -65, -48), (2.3366, -55, -44), (2.369, -64, -56),
           (2.404, -60, -49), (2.4405, -70, -57)]
# colour of the woody quiver knocks: freq_hz, relative level_db per Hz
QUIVER_BODY = [(200, -22), (450, -1), (800, 0), (1200, -2), (1500, -13), (1800, -8), (2400, -10.5),
               (4000, -22), (9000, -45)]
# how far the left port leads on the bow: freq_hz, lead_radians
BOW_PHASE = [(0, 0.5), (1980, 0.27), (3360, 1.56), (3700, 0.8), (4910, 0.5), (5340, 0.8), (5680, -1.2),
             (5940, 2), (6460, 5), (6890, 5.1), (9650, 7.5), (10200, 7.5), (11600, 8.5), (13200, 10.5),
             (14300, 12.5), (16200, 12.7)]
# left minus right on the bow: freq_hz, difference_db
BOW_BALANCE = [(60, -1.5), (99, -0.5), (160, -0.5), (270, -1.5), (450, 1.0), (740, 0.5), (1220, 2.5),
               (2010, -1.5), (3330, 0.0), (5500, -0.5), (9080, 0.0), (15000, 0.5)]


def bow():
    """The string slaps home and rings the bow; the limbs shudder and shake the quiver."""
    out = np.zeros((2, N))
    for s, db in CRACKS:
        add(out, s, gain_of(db) * crack())
    add(out, CRACKS[0][0], gain_of(BOW_DB) * ring(BOW_MODES, rise_s=0.00148))
    add(out, LIMB_S, gain_of(LIMB_DB) * ring(LIMB_MODES, rise_s=0.006))
    twang = ring(TWANG, rise_s=.005, sharp=TWANG_SHARP, sag_s=TWANG_SAG_S)
    add(out, TWANG_S, gain_of(TWANG_DB) * twang)
    add(out, THUMP_S, gain_of(THUMP_DB) * burst(THUMP, t60=.17, same=.8))
    for s, body_db, tick_db in CHATTER:
        add(out, s, gain_of(body_db) * burst(QUIVER_BODY, t60=.04, same=.7))
        add(out, s, gain_of(tick_db) * burst(QUIVER_TICK, t60=0.012, same=0.64))
    add(out, RATTLE_S, rattle())
    return scatter(ports(out, BOW_PHASE, BOW_BALANCE), t60=0.39, wet_db=-15.5)


def scene():
    """Layers the park from the far air to the bow."""
    background = air() + drone() + insects()
    birds = flock() + whistler() + carol() + trill() + songbird()
    return background + birds + next_arrow() + target() + bow()


def record(dry):
    """The microphone ports cut a notch in the high treble; then the band limit."""
    hz = np.fft.rfftfreq(N, 1 / SR)
    notch_hz, width_hz, depth_db, edge_hz = 12400, 650, -18, 16000
    notch = gain_of(depth_db * np.exp(-((hz - notch_hz) / width_hz) ** 2))
    coloured = irfft(rfft(dry) * notch, N)
    lowpass = signal.firwin(255, edge_hz, window=("kaiser", 8), fs=SR)
    return signal.oaconvolve(coloured, lowpass[None], "same")


dry = scene()
out = record(dry)
generate_wav(out)
```